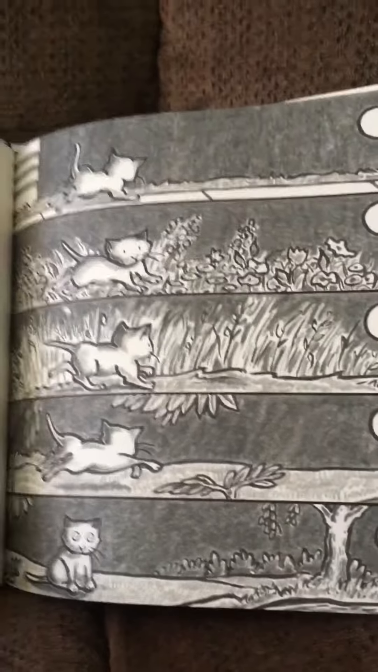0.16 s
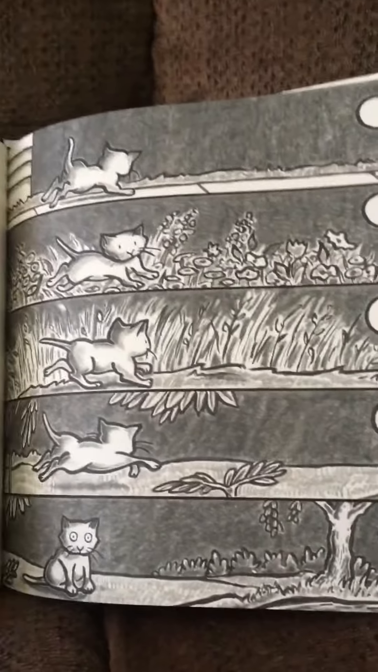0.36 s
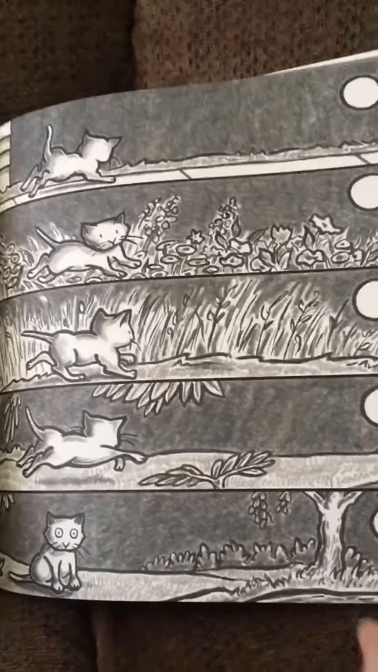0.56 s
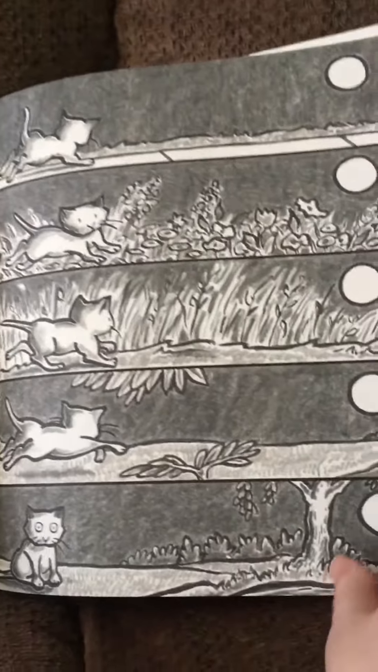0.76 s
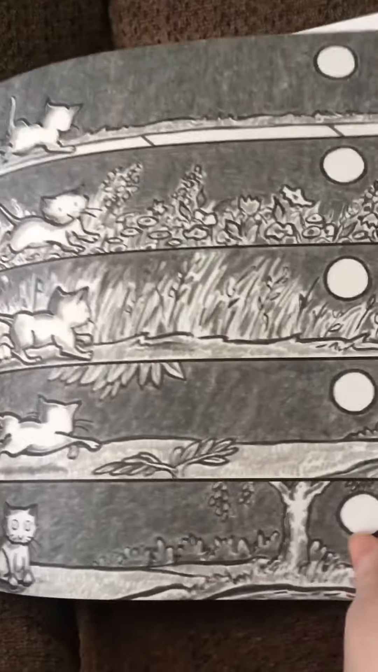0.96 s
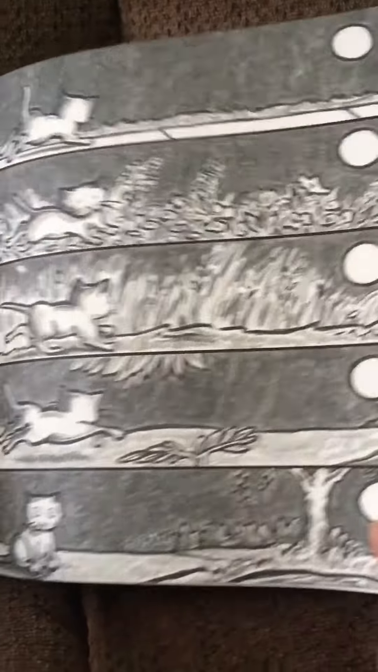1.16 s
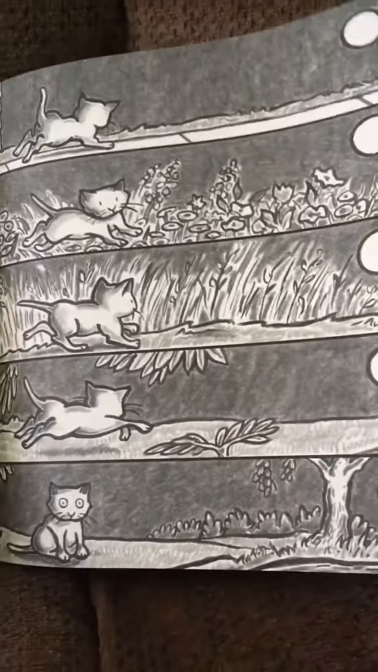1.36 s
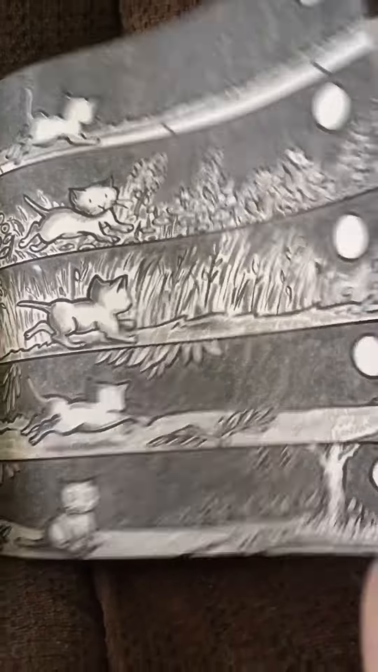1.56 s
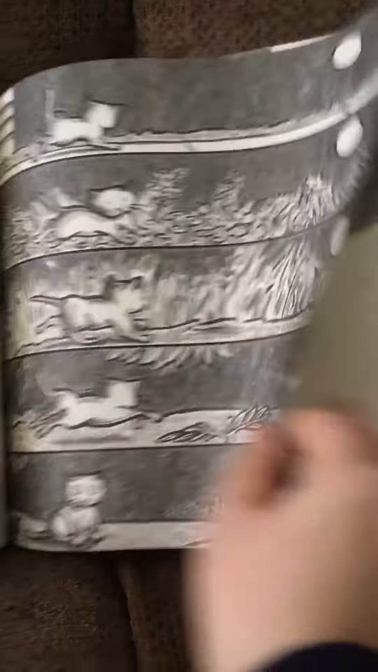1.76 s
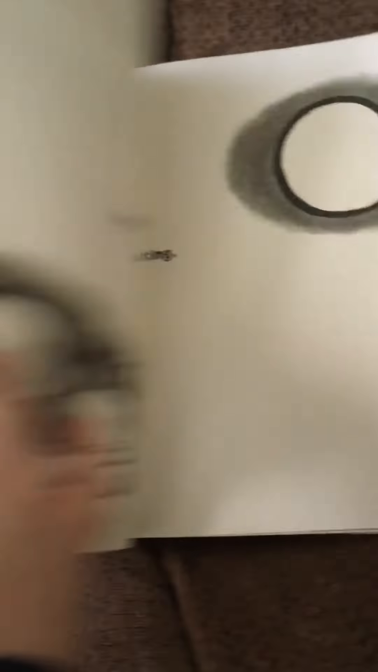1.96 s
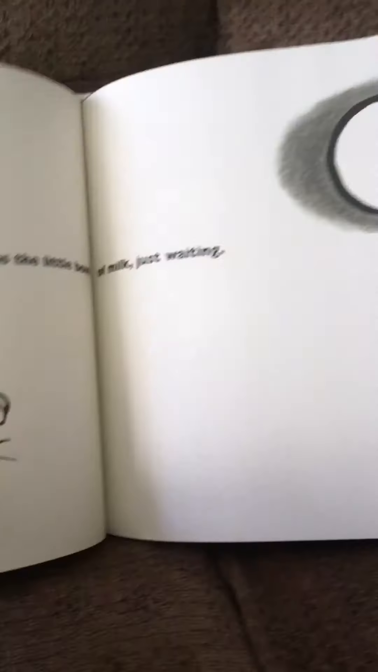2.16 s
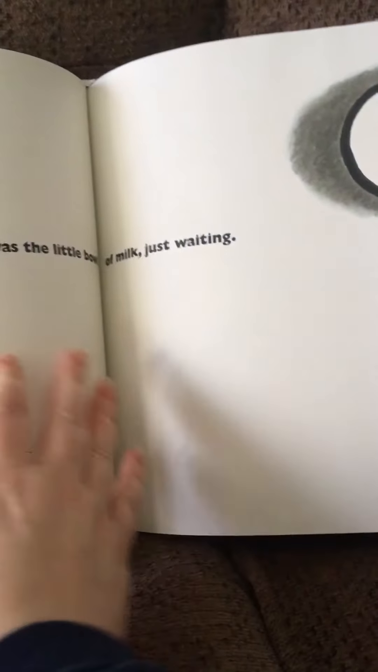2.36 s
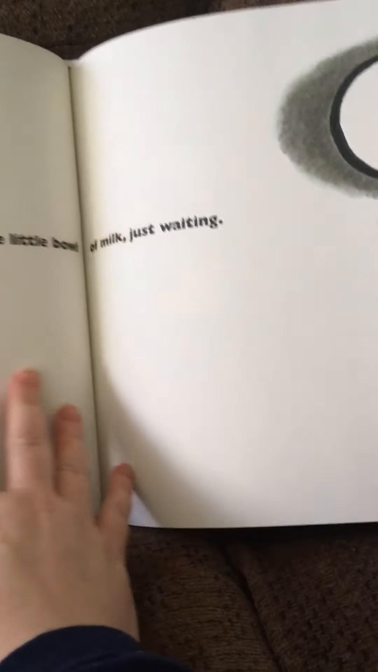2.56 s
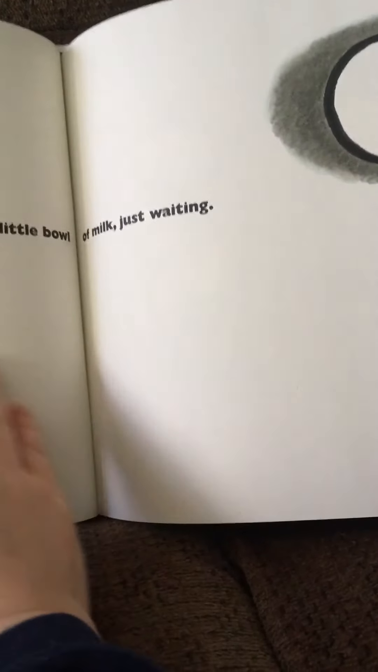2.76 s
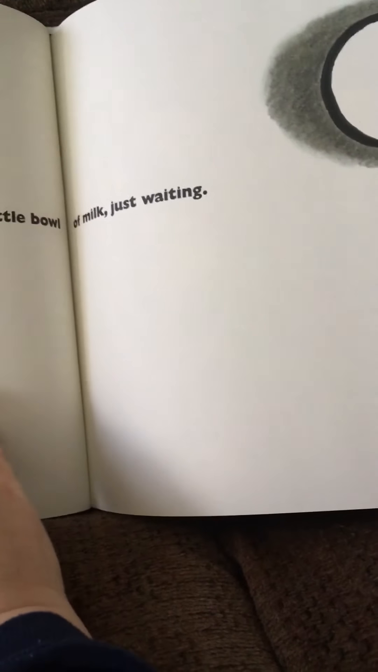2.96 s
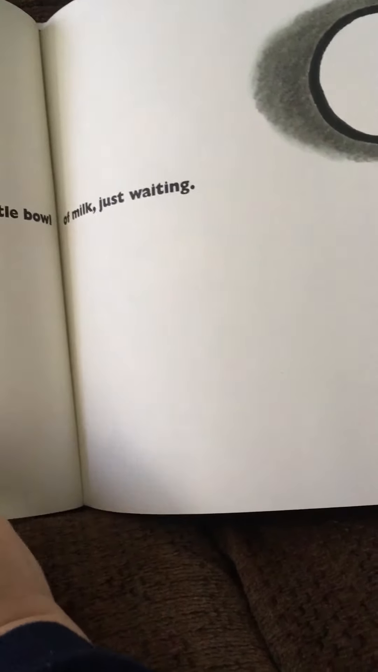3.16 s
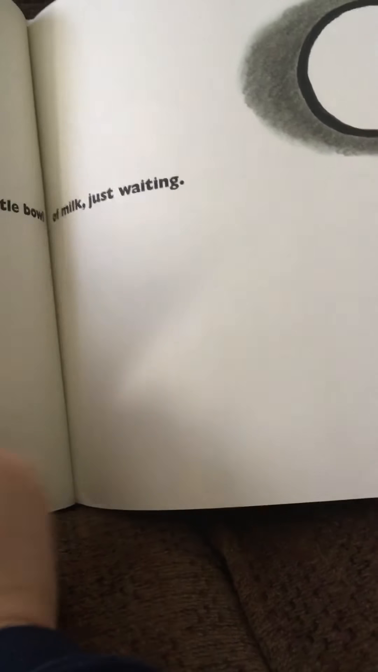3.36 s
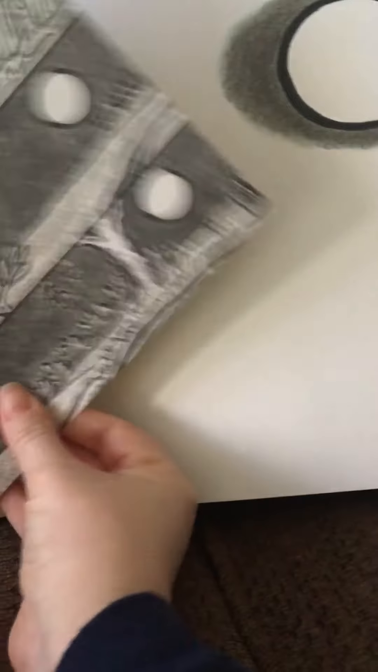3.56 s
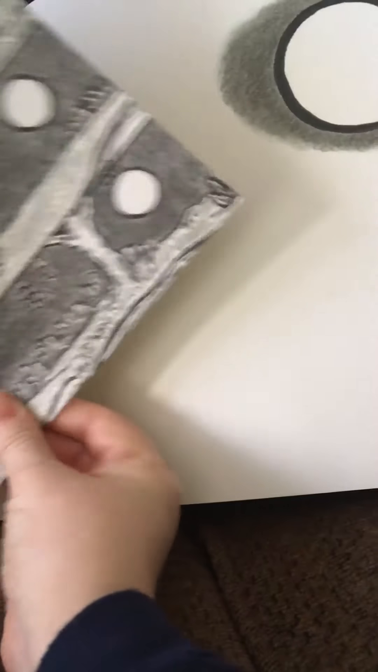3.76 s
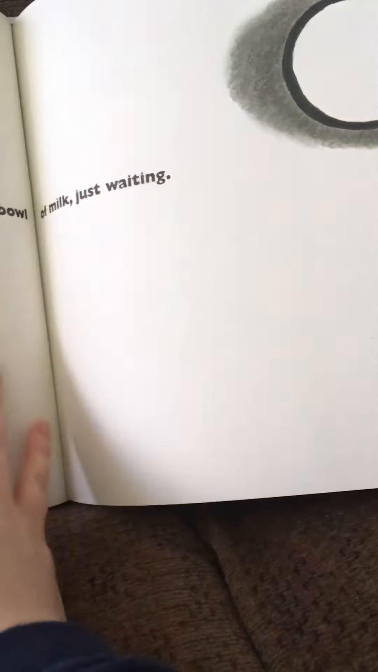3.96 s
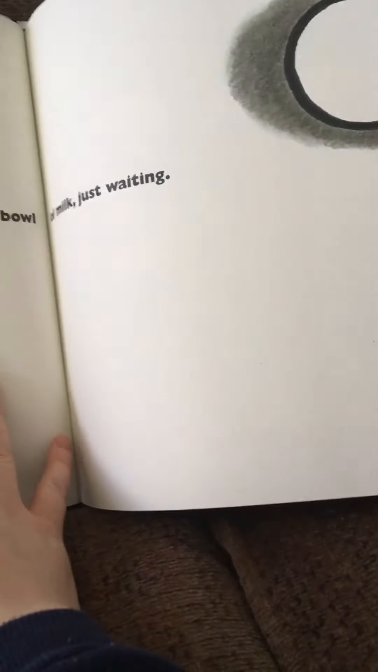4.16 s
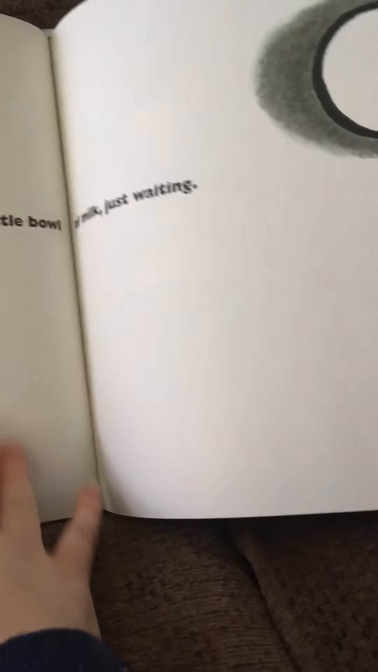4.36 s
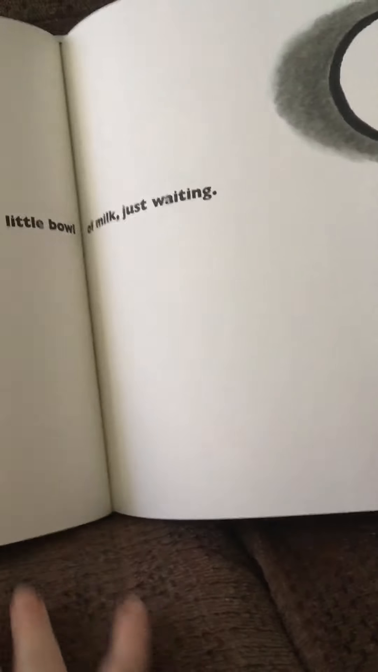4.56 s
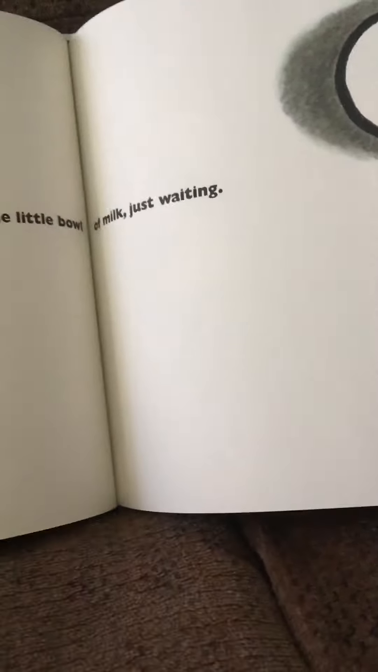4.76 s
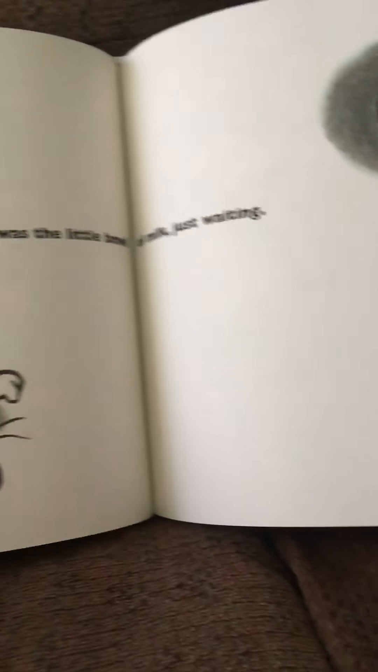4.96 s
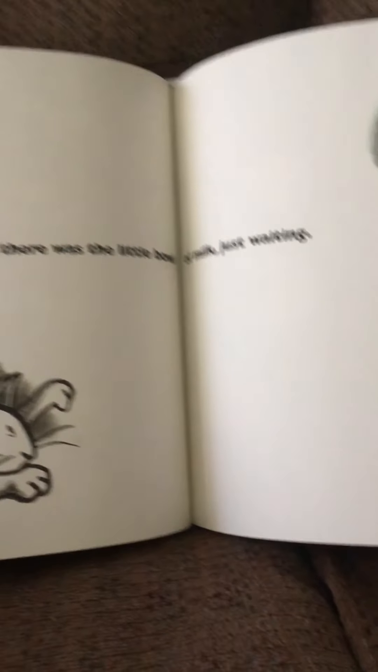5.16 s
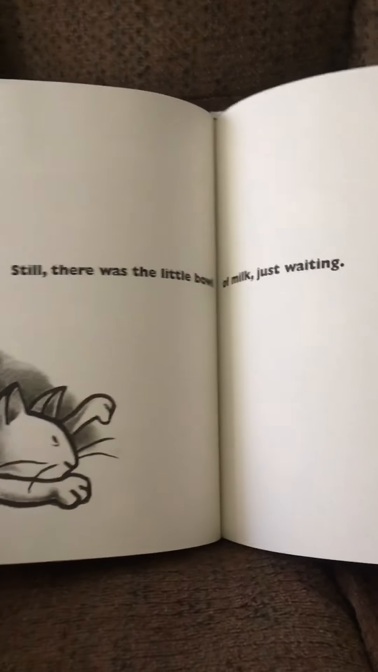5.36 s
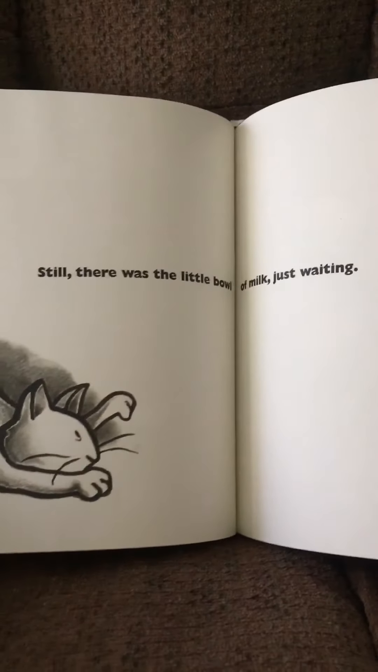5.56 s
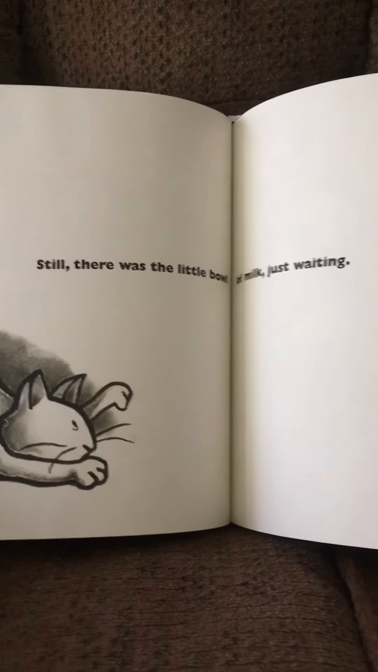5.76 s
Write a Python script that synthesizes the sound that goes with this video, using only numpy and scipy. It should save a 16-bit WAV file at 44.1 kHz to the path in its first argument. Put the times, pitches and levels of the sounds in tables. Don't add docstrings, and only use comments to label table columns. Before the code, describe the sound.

Close paper handling: a page slides, flaps and snaps over, a corner is flicked in hard cracks, then a sleeve brushes softly to rest.

```python
import sys
import numpy as np
from scipy import signal
from scipy.fft import rfft, irfft, next_fast_len
from scipy.io import wavfile
from scipy.ndimage import uniform_filter1d

SR = 44100
rng = np.random.default_rng(int(sys.argv[2]) if len(sys.argv) > 2 else 0)


def generate_wav(sig):
    pcm = np.round(np.clip(np.atleast_2d(sig).T, -1, 1) * 32767).astype(np.int16)
    wavfile.write(sys.argv[1], SR, pcm)


def amplitude_ratio(level_db):
    exponent = np.asarray(level_db, float) / 20
    return 10 ** exponent


N = 256509


def evened(x):
    return x / np.sqrt(np.mean(x ** 2) + 1e-20)


def read(points, hz):
    f, value = np.transpose(points)
    return np.interp(np.log(hz + 1), np.log(f + 1), value)


def colour(x, points):
    size = next_fast_len(len(x))
    gain = amplitude_ratio(read(points, np.fft.rfftfreq(size, 1 / SR)))
    return irfft(rfft(x, size) * gain, size)[:len(x)]


def band(x, lo_hz, hi_hz):
    return signal.sosfilt(signal.butter(2, [lo_hz, hi_hz], "bandpass", fs=SR, output="sos"), x)


def drift(seconds):
    width = max(int(seconds * SR), 2)
    return evened(uniform_filter1d(uniform_filter1d(rng.standard_normal(N), width), width))


def steady(points):
    return evened(colour(rng.standard_normal(N), points))


# f/Hz, level/dB
SOFT_TOP = [(15700, 0), (15950, -70)]


def soft_top(x):
    return colour(x, SOFT_TOP)


# f/Hz, level/dB
HARD_TOP = [(16500, 0), (16800, -70)]


def hard_top(x):
    return colour(x, HARD_TOP)


def patchy(x, patchy_db):
    z = signal.stft(x, nperseg=512, noverlap=384)[2]
    patches = rng.standard_normal(z.T.shape)
    patches = uniform_filter1d(uniform_filter1d(patches, 30, 0), 6, 1)
    z = z * amplitude_ratio(patchy_db * evened(patches).T)
    return signal.istft(z, nperseg=512, noverlap=384)[1][:N]


def friction(effort, points, slips_per_s, spread_db, clump_db, patchy_db):
    slips = rng.standard_normal(N) * (rng.random(N) < slips_per_s / SR)
    size_db = spread_db * np.minimum(rng.exponential(1, N), 3)
    slips = slips * amplitude_ratio(size_db + clump_db * drift(0.0086))
    return effort * evened(patchy(colour(slips, points), patchy_db))


def strokes(rows, swell_db, fade_db, lift_s, bitten=False):
    touch_s = 0.0097
    t = np.arange(0, N, 64) / SR
    power = np.zeros(len(t))
    for start, top, end, db, *bite_db in rows:
        if bitten:
            db = db + sum(bite_db)
        corners = np.sort([start - touch_s, start, top, end, end + lift_s])
        power += amplitude_ratio(db + np.interp(t, corners, [-50, swell_db, 0, fade_db, -50])) ** 2
    return np.interp(np.arange(N) / SR, t, power)


# t/s, level/dB
ECHOES = [
    (.0031, -29),
    (0.0112, -19),
    (0.012, -42),
]
# f/Hz, t60/s
TAIL = [(200, 0.069), (1000, 0.22), (4000, 0.16), (12000, 0.14)]


def room(x, wet_db):
    taps, walls = np.zeros((2, SR // 2))
    at = np.arange(500, len(taps) - 20, 20)
    taps[at + rng.integers(0, 20, len(at))] = rng.choice([-1., 1.], len(at))
    hz, t, z = signal.stft(taps, SR, nperseg=256)
    decay = amplitude_ratio(-60 * t / read(TAIL, hz)[:, None])
    tail = signal.istft(z * decay, SR, nperseg=256)[1][:len(taps)]
    for delay, db in ECHOES:
        walls[round(delay * SR)] = amplitude_ratio(db)
    response = amplitude_ratio(wet_db) * tail / np.linalg.norm(tail) + band(walls, 300, 2400)
    return x + signal.fftconvolve(x, response)[:N]


# f/Hz, level/dB per Hz
ROOM_TONE = [(71, -37.5), (120, -17), (197, 2), (450, -8), (782, -20), (1130, -26), (1860, -28),
             (2640, -15), (5000, -23), (14600, -10.5), (15700, -17), (16500, -39.5)]


def room_tone():
    return amplitude_ratio(-73.5) * steady(ROOM_TONE)


# f/Hz, level/dB
RUMBLE = [(18, -40), (42, 4.5), (70, 4), (88, -20), (105, -27), (160, -42), (600, -96)]


def rumble():
    level_db, sway_db = -63, 2.5
    return amplitude_ratio(level_db + sway_db * drift(0.16)) * steady(RUMBLE)


# f/Hz, level/dB
HELD = [(40, -18.5), (80, 0), (150, -5.5), (210, -6), (330, -15), (600, -35), (3000, -96)]


def held_phone():
    return amplitude_ratio(-70) * steady(HELD)


# start t/s, peak t/s, end t/s, level/dB
KNOCKS = [(.79, .805, 0.92, -50), (.97, 1.024, 1.11, -59), (1.27, 1.293, 1.38, -51.5),
          (1.51, 1.52, 1.55, -52), (1.56, 1.585, 1.73, -51), (1.972, 1.978, 2.018, -47.5),
          (2.083, 2.125, 2.145, -43), (2.155, 2.165, 2.2, -45), (2.2, 2.22, 2.32, -55),
          (2.58, 2.7, 2.8, -59.5), (2.95, 3.03, 3.2, -65.5), (4.19, 4.215, 4.25, -53),
          (3.294, 3.3, 3.43, -45.5), (3.465, 3.485, 3.6, -46), (3.545, 3.556, 3.76, -45),
          (3.77, 3.8, 3.87, -44.5), (3.88, 3.969, 4.07, -46.5), (4.02, 4.085, 4.105, -50.5),
          (5.45, 5.627, 5.7, -76)]
# f/Hz, level/dB
PUSH = [(40, -34), (80, 3), (110, -2.5), (150, -5), (200, -4.5), (330, -11.5), (450, -19.5), (900, -56),
        (3000, -96.5)]


def knocks():
    effort = np.sqrt(strokes(KNOCKS, swell_db=-18, fade_db=-16.5, lift_s=0.043))
    return friction(effort, PUSH, slips_per_s=650, spread_db=3.0, clump_db=2.0, patchy_db=0.0)


# start t/s, peak t/s, end t/s, level/dB
BUMPS = [
    (.46, .505, 0.6, -56),
    (.62, .67, 0.743, -49),
]
# f/Hz, level/dB
PAD = [(30, -21), (60, 1), (130, -5), (190, -9.5), (260, -17), (450, -25.5), (800, -48)]


def bumps():
    effort = np.sqrt(strokes(BUMPS, swell_db=-18, fade_db=-16.5, lift_s=0.043))
    return friction(effort, PAD, slips_per_s=450, spread_db=2.5, clump_db=2.0, patchy_db=1.0)


# t/s, peak level/dB, f/Hz
THUDS = [(.527, -43, 80), (.785, -40, 210), (.794, -42, 190), (1.5105, -39, 260), (1.553, -42, 95),
         (2.092, -38, 170), (2.104, -36, 100), (2.144, -32, 190), (2.152, -35, 100), (3.458, -39, 100),
         (3.563, -42, 170), (3.777, -43, 140), (3.802, -44, 150), (3.955, -41, 160)]


def thuds():
    cycles = 1.8
    out = np.zeros(N)
    for s, db, hz in THUDS:
        turns = np.arange(0, cycles, hz / SR)
        swell = np.sin(np.pi * (turns / cycles) ** 0.7)
        at = round(s * SR)
        out[at:at + len(turns)] += amplitude_ratio(db) * np.sin(2 * np.pi * turns) * swell
    return out


def soft_rub(rows, body):
    effort = np.sqrt(strokes(rows, swell_db=-6.5, fade_db=-5, lift_s=0.076))
    return friction(effort, body, slips_per_s=12000, spread_db=0.0, clump_db=0.0, patchy_db=2.4)


# start t/s, peak t/s, end t/s, level/dB
PRESSES = [
    (2.22, 2.42, 2.55, -63),
    (2.55, 2.68, 2.8, -68),
]
# f/Hz, level/dB
GUTTER = [(220, -28), (320, -5), (370, -5), (450, -11.5), (700, -43)]


def presses():
    return soft_rub(PRESSES, GUTTER)


# start t/s, peak t/s, end t/s, level/dB
BRUSHES = [
    (2.65, 2.72, 2.84, -51),
    (4.22, 4.41, 4.6, -56),
    (4.5, 4.66, 4.9, -58),
    (4.912, 4.95, 5.03, -56.5),
    (5.04, 5.07, 5.1, -64),
    (5.18, 5.23, 5.25, -64.5),
]
# f/Hz, level/dB
CLOTH = [(3000, -28), (7000, -12), (10000, -3.5), (13500, -0.5), (15700, -0.5), (16300, -18)]


def brushes():
    return soft_rub(BRUSHES, CLOTH)


# start t/s, peak t/s, end t/s, level/dB
CURLS = [
    (1.2, 1.235, 1.26, -55),
    (1.3, 1.39, 1.46, -48),
    (1.82, 1.86, 1.82, -66),
    (2.65, 2.68, 2.71, -65),
]
# f/Hz, level/dB
TROUGH = [(900, -28), (1400, 2), (1900, -9), (2700, -7), (3700, 0.5), (4300, -13), (5000, -27)]


def curls():
    return soft_rub(CURLS, TROUGH)


# start t/s, end t/s, start f/Hz, end f/Hz, level/dB
SQUEAKS = [(.865, .905, 4300, 4400, -58), (.962, 1.014, 4470, 4800, -57), (2.158, 2.195, 4400, 4100, -60),
           (2.282, 2.3, 4500, 4100, -53), (2.297, 2.375, 4200, 4400, -55), (2.408, 2.45, 4350, 4230, -54.5),
           (2.131, 2.142, 4400, 4500, -43), (1.205, 1.237, 4070, 3900, -51), (1.24, 1.255, 4600, 3500, -50),
           (1.46, 1.5, 6700, 5900, -55), (1.225, 1.26, 10000, 6800, -51), (1.255, 1.3, 6600, 5600, -49.5),
           (1.245, 1.26, 1780, 1850, -52), (1.315, 1.39, 1470, 1300, -53), (1.4, 1.48, 3650, 3600, -55),
           (1.41, 1.45, 9500, 8500, -53), (1.83, 1.88, 4000, 4000, -57.5)]


def squeaks():
    width = 0.13
    t = np.arange(N) / SR
    out = np.zeros(N)
    chatter = rng.standard_normal(N) * amplitude_ratio(2.8 * drift(0.0037))
    for start, end, from_hz, to_hz, db in SQUEAKS:
        at = slice(round(start * SR), round((end + 0.0054) * SR))
        r = np.exp(-np.pi * width * from_hz / SR)
        hz = np.interp(t[at], [start, end], [from_hz, to_hz])
        turn = np.exp(2j * np.pi * np.cumsum(hz) / SR)
        whistle = (turn * signal.lfilter([1], [1, -2 * r, r * r], chatter[at] / turn)).real
        swell = np.interp(t[at], [start, start + 0.0044, end, end + .006], [0.088, 1, 0.64, 0.23])
        out[at] += amplitude_ratio(db) * evened(whistle) * swell
    return out


# t/s, level/dB
FIDGET = [(0, -100), (.38, -92), (.45, -68.5), (.62, -65.5), (1.11, -70), (1.2, -65), (1.95, -64.5),
          (2.39, -65), (3.0, -62.5), (3.69, -69.5), (4.189, -66.5), (4.87, -67), (5.12, -72.5),
          (5.31, -73.5), (5.815, -84)]


def fidget_power():
    level_db = np.interp(np.arange(N) / SR, *np.transpose(FIDGET))
    return amplitude_ratio(level_db + np.array([[0], [-5], [-4]])) ** 2


def split_power(rows, swell_db, fade_db, lift_s, shares_db):
    plain = strokes(rows, swell_db, fade_db, lift_s)
    bitten = strokes(rows, swell_db, fade_db, lift_s, bitten=True)
    return np.array([plain, bitten, plain]) * amplitude_ratio(shares_db)[:, None] ** 2


# start t/s, peak t/s, end t/s, level/dB
FLAPS = [(.78, .785, 0.865, -47.5), (.985, .997, 1, -47), (1.28, 1.305, 1.46, -54),
         (2.003, 2.012, 2.06, -53), (2.084, 2.096, 2.113, -30), (2.112, 2.125, 2.16, -39),
         (2.143, 2.165, 2.205, -30.5), (2.23, 2.29, 2.4, -52), (2.41, 2.47, 2.63, -53.5),
         (3.299, 3.304, 3.32, -42), (3.33, 3.338, 3.34, -32.5), (3.364, 3.374, 3.41, -44.5),
         (3.462, 3.466, 3.5, -42), (3.558, 3.57, 3.67, -48.5), (3.7, 3.706, 3.78, -48.5),
         (3.772, 3.778, 3.81, -41), (3.855, 3.885, 3.926, -40.5), (3.93, 3.955, 3.99, -40.5),
         (3.98, 4.005, 4.086, -55.5), (4.07, 4.14, 4.2, -59.5), (1.33, 1.38, 1.38, -57),
         (3.09, 3.16, 3.24, -48), (4.21, 4.49, 4.8, -58.5), (4.91, 4.95, 5.07, -61.5)]


def flap_power():
    return split_power(FLAPS, swell_db=-11, fade_db=-10.5, lift_s=0, shares_db=(-19, -18, -0.5))


# start t/s, peak t/s, end t/s, level/dB, edge bite/dB
RUBS = [(.4, .557, 0.6, -61.5, -24), (.69, .76, 0.78, -59, 2), (1.59, 1.646, 1.705, -48.5, -2),
        (1.7, 1.8, 1.846, -50, -6), (1.83, 1.856, 1.89, -50, -6.5), (1.9, 1.928, 1.96, -54, -16),
        (2.0, 2.04, 2.3, -64.5, 4), (2.098, 2.113, 2.141, -37, -8.5), (1.33, 1.36, 1.23, -49, -3),
        (2.412, 2.472, 2.6, -50, -4), (2.52, 2.575, 2.64, -55.5, -0.5), (2.64, 2.7, 2.79, -50, -24),
        (2.72, 2.79, 2.87, -55.5, -8), (2.88, 2.935, 2.975, -51.5, -9), (3.024, 3.04, 3.11, -49.5, -6),
        (3.59, 3.64, 3.656, -47, -3), (3.775, 3.849, 3.877, -41.5, -8.5), (4.209, 4.215, 4.39, -59, -1),
        (4.3, 4.412, 4.51, -50.5, -10.5), (4.44, 4.51, 4.62, -54, -2.5), (4.58, 4.69, 4.85, -55.5, -11),
        (4.91, 4.96, 5, -61.5, -6.5), (5.2, 5.245, 5.27, -68, -6)]


def rub_power():
    return split_power(RUBS, swell_db=-7, fade_db=-7.5, lift_s=0, shares_db=(0, 0, -15))


# start t/s, peak t/s, end t/s, level/dB, edge bite/dB
SLIDES = [(.62, .69, 1, -59.5, -1), (.786, .79, 0.88, -51, 4), (.99, .996, 1, -44, 4),
          (1.148, 1.17, 2.3, -58.5, 0.5), (1.2, 1.25, 1.274, -49, 0), (1.27, 1.305, 1.333, -42, 1),
          (1.33, 1.4, 1.45, -50, 3.5), (1.46, 1.522, 1.52, -46, 1), (1.54, 1.568, 1.596, -52, 5),
          (2.079, 2.084, 2.133, -43.5, 0), (2.278, 2.31, 2.36, -54, 0), (3.08, 3.15, 3.235, -43.5, 0),
          (3.16, 3.205, 3.25, -45.5, -1.5), (3.29, 3.33, 3.41, -47, -0.5), (3.455, 3.462, 3.53, -53.5, 4.5),
          (3.71, 3.77, 3.8, -54.5, 0), (4.08, 4.13, 4.14, -67, 4)]


def slide_power():
    return split_power(SLIDES, swell_db=-12, fade_db=-8.5, lift_s=0.0862, shares_db=(0.5, 0, -8.5))


# start t/s, peak t/s, end t/s, level/dB, edge bite/dB
CATCHES = [(0.88, 0.9, 0.927, -55.5, 2.5), (4.05, 3.8, 4.16, -65.5, 2), (3.28, 3.292, 3.294, -53, -5),
           (3.52, 3.9, 3.558, -55, -6), (3.915, 3.93, 3.934, -52.5, -1), (1.5, 1.53, 1.535, -49, -2),
           (1.372, 1.384, 1.39, -49, -5), (2.208, 2.224, 2.232, -39.5, -0.5),
           (3.385, 3.43, 3.44, -51.5, -1), (3.445, 3.455, 3.457, -59, 0), (3.892, 3.9, 3.912, -46, 3),
           (3.939, 3.95, 3.954, -37.5, -1.5), (3.965, 4.0, 4.033, -54, -0.5),
           (3.862, 3.874, 3.88, -45.5, -1)]


def catch_power():
    return split_power(CATCHES, swell_db=-4, fade_db=-2, lift_s=0.012, shares_db=(0, -0.5, -9.5))


# f/Hz, level/dB per Hz
HISS = [(1760, -28), (3000, -3), (3590, -2), (4940, -6.5), (6080, 0), (7910, 1), (15000, 3.5),
        (16200, -16.5), (16500, -47.5)]
# f/Hz, level/dB
SCRAPE = [(900, -13), (1800, 0.5), (2600, -1), (3700, -4), (4600, -1), (6200, -5.5), (9000, -45)]
# f/Hz, level/dB
SHEET = [(250, 0.5), (480, -4.5), (620, 1.5), (950, 2.5), (1300, 1.5), (1800, -6), (2600, -16.5),
         (4000, -42)]


def paper_friction():
    power = fidget_power() + rub_power() + slide_power() + flap_power() + catch_power()
    skin, edge, sheet = np.sqrt(power)
    hiss = friction(skin, HISS, slips_per_s=22000, spread_db=-0.5, clump_db=0.5, patchy_db=2.4)
    scrape = friction(edge, SCRAPE, slips_per_s=9000, spread_db=0.5, clump_db=2.0, patchy_db=2.4)
    wobble = friction(sheet, SHEET, slips_per_s=9000, spread_db=0.5, clump_db=0.0, patchy_db=1.8)
    return hiss + scrape + wobble


# t/s, peak level/dB, f/Hz, t60/s
TICKS = [(0.785, -46, 12000, .006), (1.05, -52, 11000, 0.0069), (1.147, -37, 13100, 0.0065),
         (1.303, -36, 12400, .012), (1.36, -48, 12000, .01), (1.384, -41, 11000, .012),
         (1.511, -27, 13020, .006), (1.511, -23, 2580, 0.013), (1.511, -30, 8500, .006),
         (1.858, -48, 13970, .01), (1.871, -41, 11000, .01), (0.785, -33, 2980, 0.0091),
         (.813, -34, 2200, 0.0088), (0.812, -43, 4230, 0.0063), (3.939, -30, 2800, 0.0075),
         (3.955, -33, 8000, .008), (2.091, -31, 2280, 0.015), (2.098, -27, 2480, .01),
         (3.777, -42, 6000, .01), (3.803, -34, 6040, 0.011), (2.077, -31.5, 6600, .014),
         (2.078, -38, 3320, .012), (2.135, -32, 3540, 0.017), (2.145, -36, 6000, .006),
         (2.14, -33, 6350, .01), (2.154, -31, 6300, 0.0074), (2.18, -40, 7000, 0.0054),
         (2.393, -45, 3570, 0.015), (2.393, -57, 6400, 0.0091), (2.412, -41, 6080, 0.013),
         (3.298, -32, 5600, .014), (3.328, -18, 3600, 0.011), (3.362, -19.5, 3700, 0.012),
         (3.329, -30, 7160, .006), (3.362, -30, 13100, .008), (3.458, -25, 6130, 0.0084),
         (3.486, -30.5, 3200, 0.0064), (3.493, -36, 3200, .014), (3.563, -22, 5880, 0.0093),
         (3.596, -30.5, 4840, 0.01), (3.596, -31.5, 7100, .008), (4.69, -55, 12150, 0.013),
         (5.0272, -43, 12800, .004), (5.0272, -47, 10200, .004), (5.143, -53, 13400, .005),
         (4.108, -55, 13000, .004), (4.189, -56, 14000, .004), (3.926, -45, 14500, .005),
         (5.222, -61, 7010, .014), (5.3, -60, 9000, .012)]


def ticks():
    out, t = np.zeros(N + 1000), np.arange(1000) / SR
    for s, db, hz, t60 in TICKS:
        grit = band(rng.standard_normal(1000), 0.81 * hz, min(1.03 * hz, 20000))
        body = np.sin(2 * np.pi * hz * t) + 0.43 * evened(grit)
        at = round((s + .0003) * SR)
        out[at:at + 1000] += np.minimum(t / 0.00039, 1) * amplitude_ratio(db - 60 * t / t60) * body
    return hard_top(out[:N])


def snaps(rows, t60):
    flutter_s = 0.008
    out, t = np.zeros(N + 4000), np.arange(4000) / SR
    rise = (1 - np.exp(-t / 0.00026)) ** 2
    fade = amplitude_ratio(-60 * t / t60)
    shove = 0.12 * np.sin(2 * np.pi * 210 * t) * amplitude_ratio(-60 * t / 0.02)
    flutter = 0.15 * fade ** 0.19 / (1 + (t / flutter_s) ** 6)
    for s, db, hz, crack_db, fizz_db in rows:
        a, b, c = rng.standard_normal((3, 4000))
        sag = hz * (t + 0.00028 * (1 - np.exp(-t / 0.0016)))
        ring = (0.32 * np.sin(2 * np.pi * 0.608 * sag) - np.sin(2 * np.pi * sag)) * fade
        rattle = evened(band(band(c, 370, 2120), 370, 2120)) * (0.5 * fade + 0.085 * fade ** 0.21)
        crack = amplitude_ratio(crack_db + 6) * evened(band(a, 1820, 4900)) * fade ** 1.23
        fizz = amplitude_ratio(fizz_db + 6) * evened(band(b, 5000, 16200))
        fizz = fizz * (fade ** 2.57 + flutter + 0.035 * fade ** 0.2)
        at = round((s + .0007) * SR)
        out[at:at + 4000] += amplitude_ratio(db + 0.5) * rise * (ring + rattle + shove + crack + fizz)
    return out[:N]


# t/s, ring level/dB, f/Hz, crack/dB re ring, fizz/dB re ring
REBOUNDS = [(.7875, -31, 1490, -10, -20), (.806, -40, 1910, -9, -16), (.817, -38, 704, -12, -20),
            (1.004, -39, 1180, -18, -16), (1.513, -35, 490, -20, -25), (3.2995, -25, 920, -18, -20),
            (3.331, -25.5, 787, -22, -25.5), (3.339, -27, 1300, -14, -22), (3.309, -40, 1400, -14, -25),
            (3.498, -36, 1100, -11, -25), (3.878, -34, 1300, -26, -25), (3.373, -25, 1050, -18, -26.5),
            (2.086, -34, 850, -22, -23), (2.092, -19.5, 630, -25, -25), (2.104, -27.5, 1520, -24, -22),
            (2.109, -32, 910, -16, -25.5), (2.171, -32, 1220, -24, -28), (2.183, -31, 1290, -34, -28),
            (3.621, -43, 855, -14, -16.5)]


def rebounds():
    return soft_top(snaps(REBOUNDS, t60=0.017))


# t/s, ring level/dB, f/Hz, crack/dB re ring, fizz/dB re ring
TURN_SNAPS = [(0.557, -52.5, 610, -22, 3), (0.783, -25, 1570, -9, -9), (0.813, -26, 664, -4, -14),
              (0.847, -39.5, 720, 2, 3.5), (0.861, -31.5, 690, -11, -30), (0.988, -36, 670, -6, -14),
              (0.996, -40.5, 760, -23, 4), (1.147, -47.5, 1370, 0.5, 2.5), (1.301, -39, 900, -5, -8),
              (1.382, -46, 1680, -3, 0), (1.511, -25.5, 1510, -12.5, -10), (1.569, -36, 1630, -9, -17),
              (1.669, -34.5, 1220, -18, -12), (2.008, -44.5, 1030, -11, -22), (2.075, -50.5, 963, 12.5, 15),
              (2.089, -20.5, 1390, -30, -18), (2.096, -21, 1810, -29, -19), (2.139, -34.5, 1020, -3, 10.5),
              (2.143, -23.5, 1210, -16, -20), (2.152, -26, 1300, -17, -7), (2.179, -28, 1390, -22, -15),
              (2.393, -41.5, 1010, -20, -8), (2.411, -54, 1430, 4, -3)]


def turn_snaps():
    return soft_top(snaps(TURN_SNAPS, t60=0.015))


# t/s, ring level/dB, f/Hz, crack/dB re ring, fizz/dB re ring
FOLD_SNAPS = [(3.296, -20, 1150, -18, -13), (3.327, -16.5, 1010, -10, -9),
              (3.3615, -13.5, 1219, -12, -13.5), (3.458, -13.5, 1250, -20, -11),
              (3.485, -15.5, 1026, -15.5, -15.5), (3.5628, -14, 980, -15, -18),
              (3.595, -21, 950, -22, -13.5), (3.7045, -23.5, 690, -54, -39), (3.776, -34.5, 784, -9, -4),
              (3.791, -25, 800, -15, -15), (3.801, -27.5, 1000, -9, -7.5), (3.884, -23.5, 1310, -30, -25),
              (3.896, -24.5, 1320, -15, -12), (3.936, -30.5, 1560, -2, -13), (4.214, -48, 666, -25, -30)]


def fold_snaps():
    return hard_top(snaps(FOLD_SNAPS, t60=0.013))


def scene():
    background = room_tone() + rumble()
    handling = held_phone() + knocks() + bumps() + thuds()
    soft_rubs = presses() + brushes() + curls()
    creases = ticks() + rebounds() + turn_snaps() + fold_snaps()
    paper = soft_top(paper_friction() + squeaks()) + creases
    direct = soft_top(background + handling + soft_rubs)
    mono = amplitude_ratio(-1.89) * room(paper, wet_db=-20.5) + direct
    return np.array([mono, mono])


# f/Hz, level/dB
MIC = [(20, -25), (40, 1.5), (4300, 2), (4900, -2), (5500, 2.5), (7000, 3.5), (7500, 0), (8100, 2),
       (9900, 1.5), (10500, -3), (11100, 2)]


def microphone(x):
    return colour(x, MIC)


def roll_off(x):
    return signal.sosfilt(signal.butter(12, 16830, fs=SR, output="sos"), x)


def record(dry):
    mix = np.array([microphone(channel) for channel in dry])
    return roll_off(mix)


dry = scene()
out = record(dry)
generate_wav(out)
```